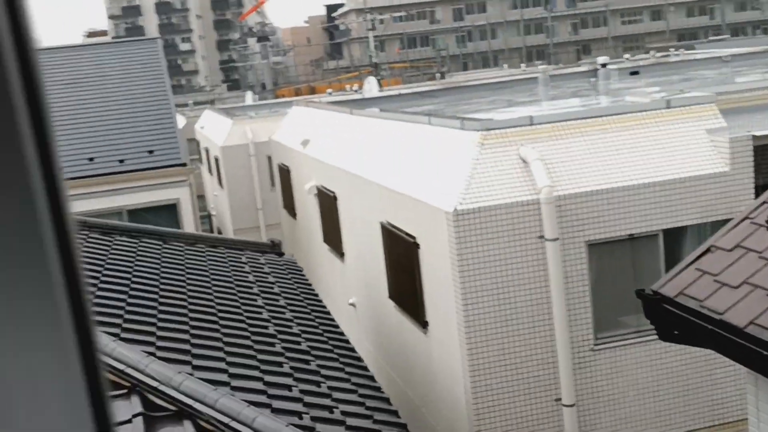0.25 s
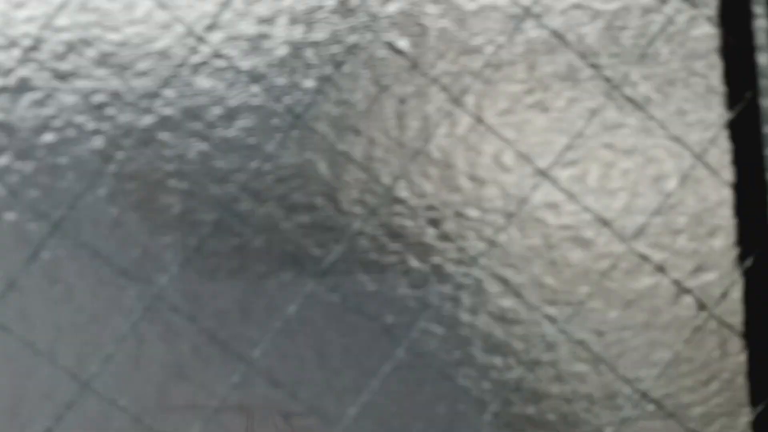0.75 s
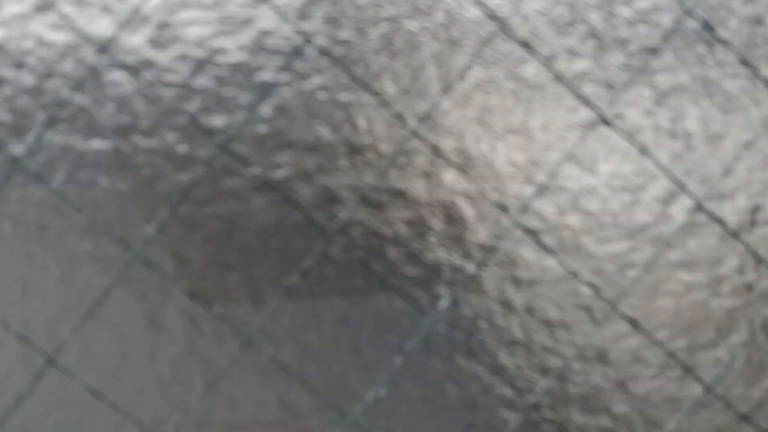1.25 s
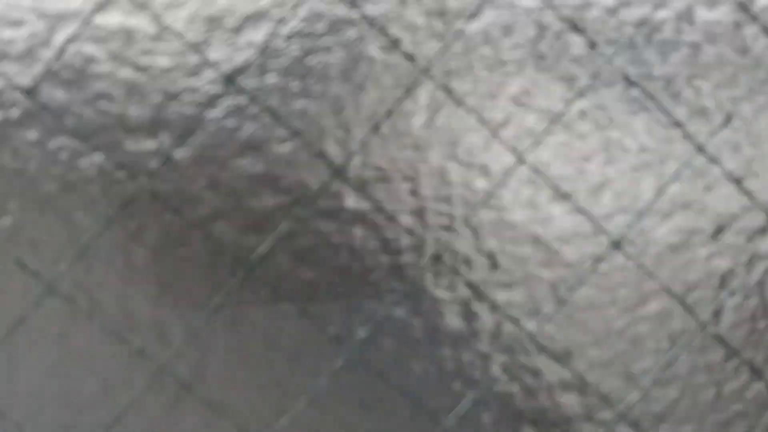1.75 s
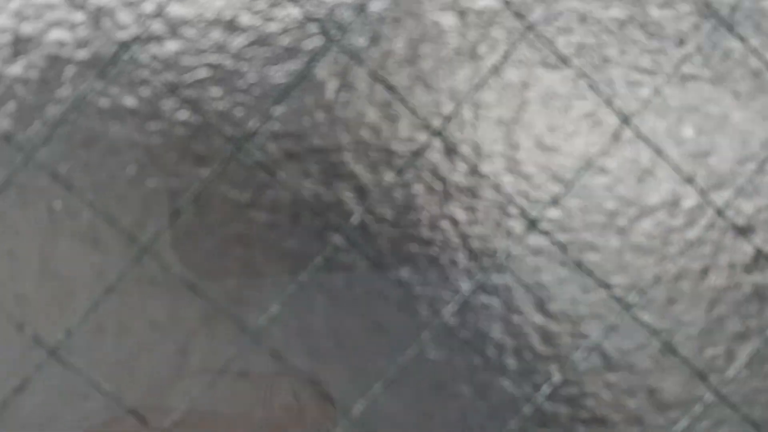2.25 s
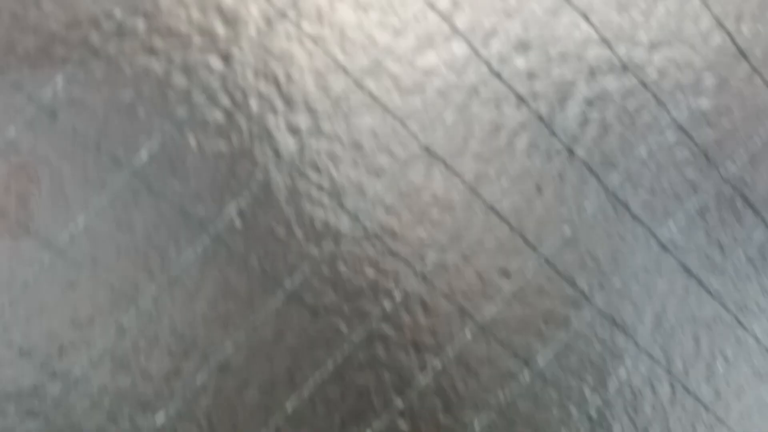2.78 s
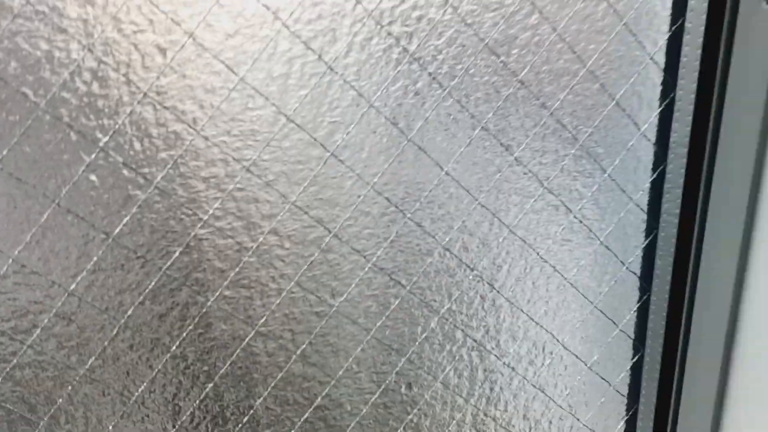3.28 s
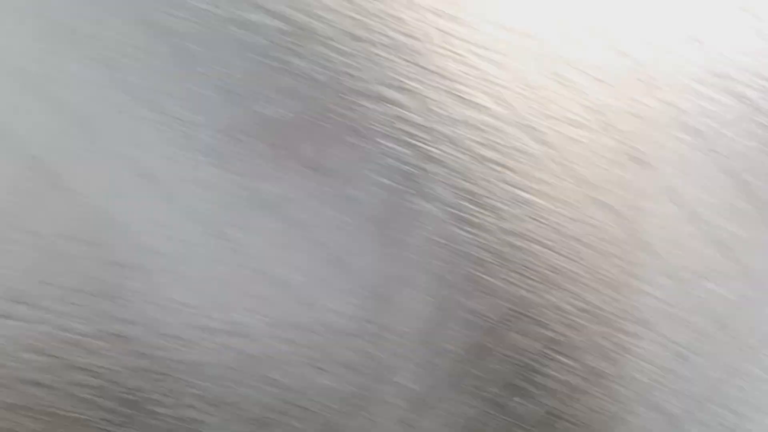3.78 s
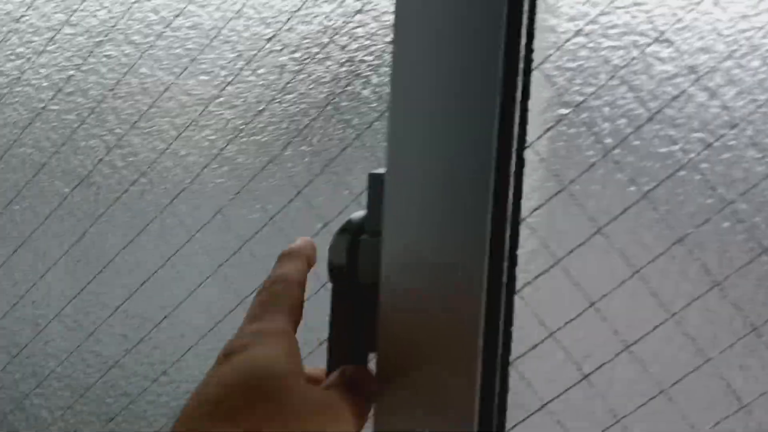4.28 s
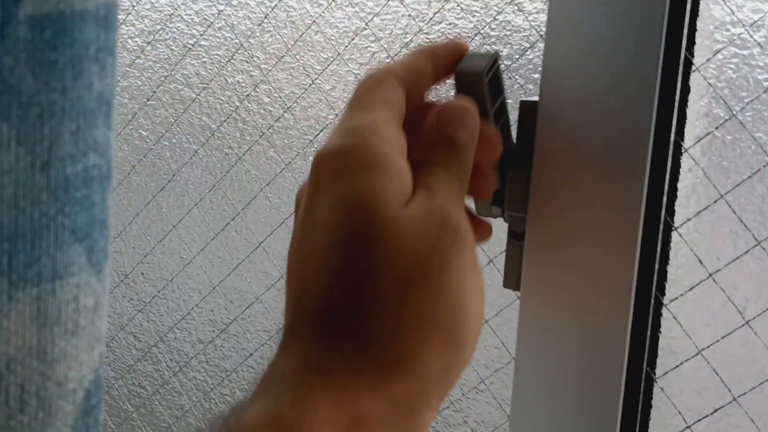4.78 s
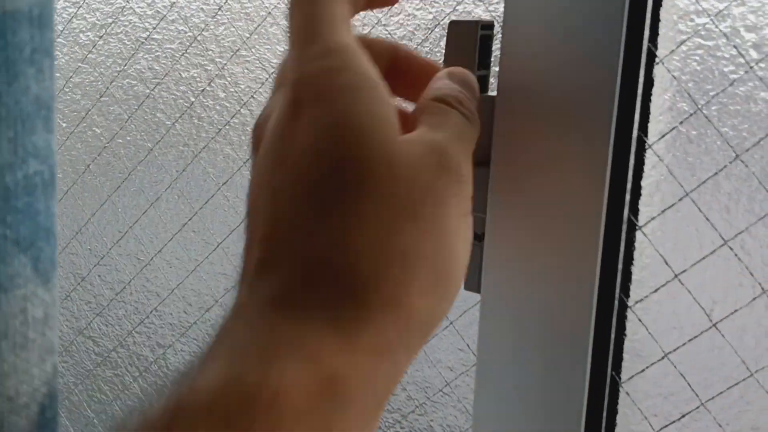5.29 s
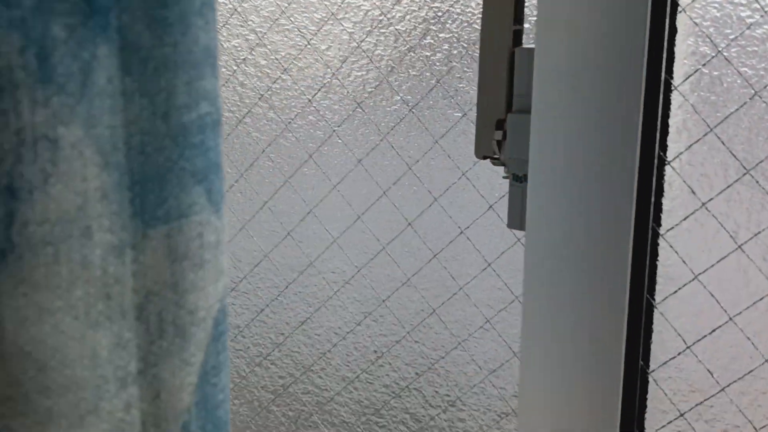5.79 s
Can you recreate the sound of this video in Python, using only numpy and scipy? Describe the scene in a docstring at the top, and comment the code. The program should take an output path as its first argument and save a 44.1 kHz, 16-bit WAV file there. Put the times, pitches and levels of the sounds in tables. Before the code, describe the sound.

A metal window scrapes along its track and slams, muffling the rain, followed by a sharp snap and the small clicks of a lock.

```python
"""A small room, a phone's microphones close to an open aluminium window, rain hissing on the roofs outside.
The sash rolls along its gritty track, scrapes as it binds, then slams into the frame at 2 s and rebounds.
The pane booms, and the rain is left faint and dull behind the glass. A sprung catch snaps on the left,
a sleeve swishes among a few light taps, and at 4.5 s a hand turns the crescent lock in short pushes:
its lever clicks and its cam judders into the keeper."""
import sys
import numpy as np
from scipy import signal
from scipy.fft import rfft, irfft
from scipy.io import wavfile
from scipy.ndimage import map_coordinates

SR = 44100
rng = np.random.default_rng(int(sys.argv[2]) if len(sys.argv) > 2 else 0)


def output_pcm(signal):
    """Save a mono or channel-first signal as 16-bit PCM at the path in sys.argv[1].

    Samples are clipped to [-1, 1] before scaling.
    """
    pcm = np.clip(np.atleast_2d(signal).T, -1, 1) * 32767
    wavfile.write(sys.argv[1], SR, np.round(pcm).astype(np.int16))


N = 266275
T = np.arange(N) / SR
FFT_SIZE = 5 * 2 ** 16
HZ = np.maximum(np.arange(FFT_SIZE // 2 + 1) * SR / FFT_SIZE, 1)

# The sash bumps along, slams home, rattles and rebounds; later the hand knocks it.
# Each row: start in seconds, then pane thump, frame clack and metal click in dB.
SASH_KNOCKS = [(1.225, -40, -60, -70), (1.334, -41, -38, -63), (1.708, -39, -31.5, -64),
               (1.9871, -28, -23.5, -50), (1.992, -28.5, -19.5, -32), (1.9952, -20.5, -10.5, -19),
               (2.0007, -16, -20, -16), (2.0194, -25.5, -36, -44), (2.031, -26, -26, -26),
               (2.056, -20, -47, -44), (2.198, -38, -44, -53), (2.209, -27, -30.5, -29.5),
               (2.226, -33.5, -37, -50), (2.239, -30.5, -41, -56), (2.268, -35, -36.5, -38.5),
               (2.629, -65, -44, -41), (4.004, -47, -51, -55), (4.829, -62, -31, -58)]
# Snaps of the catch. Each row: start in seconds, level in dB, crack's t60 in seconds, frame tick in dB.
CATCH_SNAPS = [(0.109, -43, 0.052, -65), (0.17, -33.5, 0.038, -35.5), (2.6494, -10, 0.023, -40),
               (2.651, -22.5, 0.11, -30.5), (3.249, -41, 0.095, -40)]
# Hiss of rubbing fibres, in brush seal and cloth alike. Each row: frequency in Hz, relative level in dB.
FIBRE_COLOUR = [(800, -21), (3000, -15), (5200, 2), (8000, -1), (11000, -1), (13000, -9), (16000, -24)]


def undb(db):
    """Decibels to gain."""
    return 10 ** (np.asarray(db) / 20)


def unit(x):
    """Scale to rms 1."""
    return x / np.sqrt(np.mean(x ** 2))


def pan(left_db):
    """Gains of the two channels: left minus right in dB, so a negative value sits to the right."""
    return undb(np.array([[1], [-1]]) * left_db / 2)


def response(points, grid=HZ):
    """Gain at each frequency of the grid from (Hz, dB) points."""
    hz, db = np.transpose(points)
    return undb(np.interp(np.log(grid), np.log(hz), db))


def resonance(hz, width_hz):
    """Band-pass response, gain 1 at the centre."""
    return 1 / (1 + 1j * (HZ ** 2 - hz ** 2) / (HZ * width_hz))


def body(resonances):
    """Response of several steep-sided (Hz, width in Hz, dB) resonances."""
    return sum(undb(db) * resonance(hz, width) ** 2 for hz, width, db in resonances)


def filtered(x, gain):
    """Pass a sound through a frequency response."""
    return irfft(rfft(x, FFT_SIZE) * gain)[..., :N]


def colour(x, points, size=4096):
    """Minimum-phase filter shaped by (Hz, dB) points; it keeps the power of white noise."""
    grid = np.maximum(np.arange(size // 2 + 1) * SR / size, 1)
    cepstrum = irfft(np.log(unit(response(points, grid))))
    impulse = irfft(np.exp(rfft(2 * cepstrum[:size // 2], size) - cepstrum[0]))
    return signal.oaconvolve(x, impulse[None], axes=1)[:, :N]


def soften(x, hz):
    """A yielding contact lengthens the push and takes off the treble."""
    return filtered(x, 1 / (1 + np.sqrt(2) * 1j * HZ / hz - (HZ / hz) ** 2))


def bend(pair, ratio):
    """Move every resonance of a sound by a changing pitch ratio."""
    return np.array([map_coordinates(x, [np.cumsum(ratio)], mode="mirror") for x in pair])


def diffuse(pair, shared_hz=230):
    """Long waves reach both microphones alike, short ones are unrelated."""
    mid = pair[0]
    side = signal.sosfilt(signal.butter(2, shared_hz, "high", fs=SR, output="sos"), pair[1])
    return np.array([mid + side, mid - side]) / np.sqrt(2)


def wander(rate):
    """Slow random drift of rms 1, through `rate` points a second."""
    return unit(np.interp(T * rate, np.arange(1000), rng.standard_normal(1000)))


def decay(s, t60):
    """Envelope that jumps to 1 at time s and dies away."""
    envelope, start = np.zeros(N), int(s * SR)
    t = T[:min(SR // 2, N - start)]
    envelope[start:start + len(t)] = np.exp(-np.log(1000) * t / t60)
    return envelope


def stroke(s, attack_s, hold_s, release_t60):
    """Envelope of a push that starts at time s: rise, hold, die away."""
    rise = np.clip((T - s) / attack_s, 0, 1)
    released_s = np.maximum(T - s - attack_s - hold_s, 0)
    return rise * np.exp(-np.log(1000) * released_s / release_t60)


def grains(rate, share, flutter_db=0.8):
    """Tiny impacts, `rate` a second, carry a share of the power over a wash of countless fainter ones."""
    impacts = (rng.random((2, N)) < rate / SR) * rng.standard_normal((2, N))
    texture = np.sqrt(share) * unit(impacts) + np.sqrt(1 - share) * rng.standard_normal((2, N))
    return diffuse(texture) * undb(flutter_db * wander(30))


def chatter(hits):
    """Dense metal modes ring as a short noise after each (s, dB, t60) hit."""
    envelope = sum(undb(db) * decay(s, t60) for s, db, t60 in hits)
    return envelope * diffuse(rng.standard_normal((2, N)), shared_hz=696)


def struck(hits, modes):
    """Ring (Hz, dB, t60) modes with a push at each (s, dB) hit."""
    pushes = np.zeros(N)
    for s, db in hits:
        pushes[int(s * SR)] += undb(db)
    t = T[:SR]
    ring = sum(undb(db) * np.exp(-np.log(1000) * t / t60) * np.cos(2 * np.pi * hz * t)
               for hz, db, t60 in modes)
    return filtered(pushes, rfft(ring, FFT_SIZE))


def room(x, wet_db, t60=0.29, treble_t60=0.18, split_hz=4000):
    """A small room: the near walls answer after a few ms and swallow the treble first."""
    noise = rng.standard_normal((2, N))
    low = filtered(noise, 1 / (1 + (HZ / split_hz) ** 2))
    tail = low * decay(0.0062, t60) + (noise - low) * decay(0.0055, treble_t60)
    return x + undb(wet_db) * filtered(x, rfft(unit(tail) / np.sqrt(N), FFT_SIZE))


def travel():
    """Speed of the sash, and the share of the opening that it has yet to cover."""
    # The push on the sash. Each row: time in seconds, share of top speed.
    push = [(0.19, 0.139), (0.33, 0.89), (.56, 0.7), (.93, 1), (1.33, 0.74), (1.5, 0.53), (1.84, 0.37),
            (1.97, 0.783), (1.99, 0.15)]
    speed = np.interp(T, *np.transpose(push), left=0, right=0)
    covered = np.cumsum(speed)
    return speed, 1 - covered / covered[-1]


def rain(outside_db=-48, indoors_db=-52):
    """Drops on the roofs outside reach the microphones through the gap; a dull wash passes the glass."""
    # Rain through the gap and through the glass. Each row: frequency in Hz, relative level in dB.
    gap_colour = [(30, -24), (100, 1), (250, 3.5), (600, -17), (1050, -1.5), (1500, -13), (2500, -16.5),
                  (4000, -19.5), (9000, -25), (16000, -34)]
    glass_colour = [(25, -20), (55, 3), (100, 10), (160, 5.5), (240, 1), (305, 5.5), (385, -4.5),
                    (700, -6.5), (1300, -5.5), (2000, -9), (3500, -18.5), (7000, -28.5), (16000, -32.5)]
    _, gap = travel()
    outside = colour(grains(rate=1700, share=0.57), gap_colour)
    inside = colour(grains(rate=760, share=0.22), glass_colour)
    return undb(outside_db) * np.sqrt(gap) * outside + undb(indoors_db) * inside


def arm(reach_s=3.675, rub_db=-44.5):
    """Sleeve fibres catch and slip close by: the rustle follows the arm's speed, the swish its square."""
    # Arm movements. Each row: fastest moment and swell time in seconds, rustle and swish in dB.
    moves = [(2.8, 0.33, -66.5, -58.5), (3.76, 0.38, -61, -46), (4.5, 0.2, -65, -53.5),
             (5.83, 0.15, -66.5, -66)]
    # The sleeve's swish. Each row: frequency in Hz, relative level in dB.
    swish_colour = [(200, -4.5), (700, -5), (1000, -9), (1600, -6.5), (2600, -4), (3300, -10),
                    (4500, -15.5), (8000, -23), (15000, -30)]
    # Resonances of the rubbing sleeve. Each row: centre and width in Hz, level in dB.
    rub_rings = [(2510, 210, -7), (2930, 480, -5), (3340, 300, 1), (3900, 680, -6.5)]
    rustle, swish = 0, 0
    for s, swell_s, rustle_db, swish_db in moves:
        speed = np.exp(-np.abs(T - s) / swell_s)
        rustle += undb(rustle_db) * speed
        swish += undb(swish_db) * speed ** 2
    cloth = rustle * colour(grains(rate=2100, share=0.53), FIBRE_COLOUR)
    weave = swish * colour(grains(rate=1700, share=0.11), swish_colour)
    # On the long reach for the lock the sleeve rubs with a thin, wavering ring.
    fibres = grains(rate=450, share=0.6, flutter_db=1.5)
    rub = unit(bend(filtered(fibres, body(rub_rings)), 1 + 0.03 * wander(14)))
    reach = stroke(reach_s, attack_s=0.033, hold_s=0.055, release_t60=0.83)
    return cloth + weave + undb(rub_db) * reach * rub


def upright_thuds():
    """The sash's upright answers soft pushes with a short, low knock."""
    # Pushes of the hand and the catch. Each row: start in seconds, level in dB.
    pushes = [(.094, -42), (.108, -48.5), (2.631, -39.5), (2.676, -35), (2.775, -44), (4.703, -51),
              (4.733, -55), (4.833, -38.5)]
    # Modes of the upright. Each row: frequency in Hz, level in dB, t60 in seconds.
    modes = [(94, -13, 0.17), (153, -7.5, 0.45), (200, -5, 0.16), (219, 2, 0.19), (235, -6, 0.093),
             (303, -6, 0.17), (318, -20, .12), (470, -11, .12), (520, -11, .12)]
    return soften(struck(pushes, modes), hz=330)


def metal_taps():
    """Light taps on thin metal: a bright tick and a short ring near 3 kHz, with plenty of room."""
    # The taps. Each row: start in seconds, tick in dB, tick's t60 in seconds, ring in dB.
    taps = [(3.51, -44, 0.025, -64), (3.593, -40, 0.012, -69), (3.756, -32.5, 0.045, -61),
            (4.005, -30.5, 0.035, -49)]
    # The tick. Each row: frequency in Hz, relative level in dB.
    tick_colour = [(200, -9), (450, 2.5), (900, -9), (2000, -5), (2600, 8), (3450, 8.5), (4000, -3.5),
                   (6000, -9), (12000, -27)]
    # Modes of the tapped metal. Each row: frequency in Hz, level in dB, t60 in seconds.
    modes = [(2400, -11, 0.091), (2970, -9, .14), (2972, -2, 0.28), (3400, -15, 0.058)]
    tick = colour(chatter([(s, db, t60) for s, db, t60, _ in taps]), tick_colour)
    ring = struck([(s, db) for s, _, _, db in taps], modes)
    return room(tick + ring, wet_db=-6)


def frame_ticks(q=1.28, jolt_hz=1640, jolt_t60=0.056, knock_offset_db=-11.5):
    """Each tick rings one broad resonance of the frame; every knock and snap also jolts one out of it."""
    # Ticks and creaks of the frame, some alone, some with a knock, snap or tap.
    # Each row: start in seconds, level in dB, centre in Hz, t60 in seconds.
    ticks_and_creaks = [(.109, -45.5, 3840, 0.066), (.171, -37.5, 3970, 0.027), (1.889, -34.5, 1270, 0.074),
                        (1.963, -33.5, 1300, 0.06), (2.21, -36.5, 1420, 0.1), (2.268, -38, 1760, 0.067),
                        (2.592, -43, 3180, 0.014), (2.858, -37, 1410, 0.049), (2.896, -37, 950, 0.03),
                        (3.142, -48.5, 2740, 0.035), (3.509, -42.5, 1700, 0.026),
                        (3.594, -41.5, 1900, 0.023), (4.748, -46, 1890, 0.087), (5.838, -44.5, 1840, 0.055),
                        (5.865, -43.5, 1270, 0.053)]
    jolts = [(s, db + knock_offset_db) for s, _, db, _ in SASH_KNOCKS]
    jolts += [(s, db) for s, _, _, db in CATCH_SNAPS]
    events = ticks_and_creaks + [(s, db, jolt_hz, jolt_t60) for s, db in jolts]
    ticks, length = np.zeros((2, N)), SR // 8
    for s, db, hz, t60 in events:
        b, a = signal.iirpeak(hz, q, fs=SR)
        noise = rng.standard_normal((2, length))
        band = unit(signal.lfilter(b, a, signal.lfilter(b, a, noise)))
        span = slice(int(s * SR), int(s * SR) + length)
        ticks[:, span] += undb(db) * decay(s, t60)[span] * band
    return room(ticks, wet_db=-7.5)


def crescent_lock():
    """Close to the microphones the lever clicks and rubs on its pivot, and the cam judders as it turns."""
    # Short pushes on the lever. Each row: start and hold in seconds, pivot rub and cam judder in dB.
    turns = [(4.496, 0.044, -45.5, -54), (4.594, 0.037, -45, -48), (4.688, 0.07, -52.5, -40),
             (4.825, 0.04, -47.5, -40)]
    # The lever's clicks. Each row: start in seconds, level in dB, t60 in seconds.
    lever_clicks = [(4.451, -39.5, 0.031), (4.4965, -34.5, 0.061), (4.505, -37, 0.028),
                    (4.647, -46.5, 0.033), (4.871, -48, 0.013), (4.929, -51, 0.013)]
    # Lever click and pivot rub. Each row: frequency in Hz, relative level in dB.
    click_colour = [(400, -1), (1800, 7), (3200, 0), (5600, 0), (8000, 0), (10000, -1.5), (11600, 0),
                    (13000, -12), (16000, -26)]
    rub_colour = [(300, -22), (500, 4), (620, 10), (780, -4), (1000, -15.5), (1900, -5), (3500, -24),
                  (5500, -20.5), (12000, -28.5)]
    # Resonances of the lock on the sash. Each row: centre and width in Hz, level in dB.
    judder_rings = [(120, 41, -11), (201, 27, -1), (311.4, 25, -3)]
    pivot, cam = 0, 0
    for s, hold_s, pivot_db, cam_db in turns:
        push = stroke(s, attack_s=0.0043, hold_s=hold_s, release_t60=0.24)
        pivot += undb(pivot_db) * push
        cam += undb(cam_db) * push
    slips = grains(rate=520, share=0.6, flutter_db=2)
    clicks = room(colour(chatter(lever_clicks), click_colour), wet_db=-17)
    return clicks + pivot * colour(slips, rub_colour) + cam * unit(filtered(slips, body(judder_rings)))


def keeper():
    """A little to the right, the cam knocks against its keeper, which rings briefly on the sash."""
    # The cam strikes and snaps home. Each row: start in seconds, level in dB.
    cam_hits = [(4.631, -56), (4.697, -46), (4.752, -48), (4.8295, -38.5), (4.8385, -48), (4.881, -59)]
    # Modes of the keeper. Each row: frequency in Hz, level in dB, t60 in seconds.
    modes = [(442, -5, 0.12), (493, -2, 0.13), (546, -10, 0.085), (595, 1.5, .1), (740, 4.5, 0.055),
             (900, -4, .07), (1115, -4, 0.056), (1215, 3, 0.05), (1436, -6, .07), (1707, -5, 0.081),
             (1850, -14, .07), (2230, -6, .07), (2800, -17, .08)]
    return room(pan(left_db=-2) * soften(struck(cam_hits, modes), hz=2550), wet_db=-13)


def catch(crack_db=-4, ring_db=-27, left_db_per_khz=0.5):
    """The sprung catch cracks and rings high; it sits left, so the phone shades its treble on the right."""
    # The crack. Each row: frequency in Hz, relative level in dB.
    crack_colour = [(300, -24.5), (1300, -4.5), (2450, -3), (3300, -9.5), (4800, -10), (5400, 3.5),
                    (6100, 7), (6600, -1), (7600, 8.5), (8500, -3.5), (9800, 1.5), (12500, -5.5),
                    (15000, -0.5)]
    # Modes of the steel catch. Each row: frequency in Hz, level in dB, t60 in seconds.
    modes = [(2440, -3, .08), (5650, -7, .1), (6090, -2, .1), (6500, -9, .07), (7520, -3, .09),
             (7680, -2, .11), (9515, -10, .1), (9860, -7, .11), (10130, -11, .09), (10400, -11, .1)]
    crack = undb(crack_db) * colour(chatter([(s, db, t60) for s, db, t60, _ in CATCH_SNAPS]), crack_colour)
    ring = undb(ring_db) * struck([(s, db) for s, db, _, _ in CATCH_SNAPS], modes)
    return filtered(room(crack + ring, wet_db=-14.5), pan(left_db_per_khz * HZ / 1000))


def sash_binding(start_s=1.628, scrape_db=-45, squeal_db=-54, pinch_db=-54.5):
    """Near the jamb the sash scrapes and sings thinly against the frame, and the pinched seal hisses."""
    # Scraping sash and pinched seal. Each row: frequency in Hz, relative level in dB.
    scrape_colour = [(300, -14), (900, 2.5), (1300, 7), (2000, -2.5), (3500, -3.5), (7000, -15),
                     (9300, -30), (12000, -45)]
    pinch_colour = [(1500, -11), (4000, 1), (7000, -1), (9200, 5), (10500, -5), (12500, -10), (16000, -34)]
    # Resonances of the squeal. Each row: centre and width in Hz, level in dB.
    squeal_rings = [(2680, 140, -11), (3120, 120, -13), (3570, 75, -4.5), (4340, 87, -14), (4970, 66, -6)]
    scrape = undb(scrape_db) * stroke(start_s, attack_s=0.076, hold_s=0.091, release_t60=0.25)
    squeal = undb(squeal_db) * stroke(start_s, attack_s=0.077, hold_s=0.12, release_t60=0.22)
    pinch = undb(pinch_db) * stroke(start_s, attack_s=0.12, hold_s=0.14, release_t60=0.29)
    slips = grains(rate=330, share=0.58)
    hiss = colour(grains(rate=6000, share=0.16), pinch_colour)
    singing = unit(filtered(slips, body(squeal_rings)))
    return squeal * singing + scrape * colour(slips, scrape_colour) + pinch * hiss


def sash_rolling(rumble_db=-38, open_db=-8, grind_db=-45, seal_db=-52, glide=0.12):
    """Rollers shake the pane and crunch over grit in the ringing track, while the brush seal hisses."""
    # Pane rumble, track crunch and dragged grit. Each row: frequency in Hz, relative level in dB.
    rumble_colour = [(25, -1), (60, -3.5), (110, 8), (150, -7.5), (205, 7), (300, -15), (480, -18),
                     (700, -13.5), (2000, -52)]
    crunch_colour = [(200, -14), (450, -11), (650, -5.5), (1100, -6.5), (1300, 2), (1900, -1.5),
                     (2700, -4.5), (3800, -12), (8000, -27)]
    drag_colour = [(500, -13), (1200, 1), (2000, -2), (2800, 0), (3800, -16), (8000, -19), (16000, -25)]
    # Resonances of the hollow track, and of the rollers at half travel.
    # Each row: centre and width in Hz, level in dB.
    track_rings = [(455, 96, 10), (1049, 40, 12.5)]
    roller_rings = [(1506, 83, 7), (2005, 140, -4), (2640, 200, 0)]
    # Gritty patches where the rollers drag. Each row: start and hold in seconds, level in dB.
    grit_patches = [(0.27, 0.023, -50), (0.38, 0.028, -46.5), (1.1, 0.033, -46.5), (1.216, 0.019, -54)]
    speed, gap = travel()
    # As the gap closes the rumble swells and the rollers' rings waver and sink.
    shaking = colour(grains(rate=110, share=0.037, flutter_db=3), rumble_colour)
    rumble = undb(rumble_db + open_db * gap) * speed * shaking
    crunch = colour(grains(rate=420, share=0.45, flutter_db=1.4), crunch_colour)
    pitch = 1 + glide * (gap - 0.5)
    rollers = sum(bend(filtered(crunch, body([ring])), pitch + 0.016 * wander(9)) for ring in roller_rings)
    track = filtered(crunch, 1 + body(track_rings))
    grind = undb(grind_db) * speed ** 0.93 * unit(track + rollers)
    drag = sum(undb(db) * stroke(s, attack_s=0.011, hold_s=hold_s, release_t60=0.11)
               for s, hold_s, db in grit_patches)
    patches = drag * colour(grains(rate=500, share=0.52), drag_colour)
    seal = undb(seal_db) * speed ** 1.64 * colour(grains(rate=5900, share=0.67), FIBRE_COLOUR)
    return rumble + grind + patches + seal


def jamb_slam():
    """The sash slams home and the hollow jamb gives one short, hard bark."""
    # The one row: start in seconds, level in dB.
    hit = [(1.9972, -18.5)]
    # Modes of the jamb. Each row: frequency in Hz, level in dB, t60 in seconds.
    modes = [(780, -1, 0.069), (859, 0.5, 0.053), (950, -5, .03), (1334, -17, .045)]
    return room(soften(struck(hit, modes), hz=1500), wet_db=-16)


def sash_blows(boom_db=-2, clack_db=-0.5, ring_db=-12, click_db=-3.5, clack_t60=0.032, click_t60=0.022):
    """Each blow booms in the pane, clacks and rings in the hollow frame and clicks metal on metal."""
    # Modes of glass pane and aluminium frame. Each row: frequency in Hz, level in dB, t60 in seconds.
    pane_modes = [(49, -18, 0.253), (62.4, -13.5, 0.56), (75.8, -7, 0.44), (105.9, -6.5, 0.63),
                  (130.7, -0.5, 0.11), (161, -20, 0.084), (166, -5.5, 0.26), (190.7, 0, 0.47),
                  (211.9, 2.5, 0.28), (303.5, -15, 0.25), (383.6, -8.5, 0.26), (457, -8, 0.14),
                  (531, -10.5, 0.34)]
    frame_modes = [(657, -14, 0.1), (1334, -10, 0.089), (1470, -5.5, .13), (1720, -11.5, 0.079),
                   (1780, -16, 0.099), (2375, -12, .15)]
    # Frame clack and metal click. Each row: frequency in Hz, relative level in dB.
    clack_colour = [(100, -25), (380, -4), (470, -6), (540, -1), (600, -18.5), (660, -4), (720, -4),
                    (790, 0), (880, 3), (1010, -1), (1130, -14), (1320, 2.5), (1600, -21), (2300, -16.5),
                    (3500, -35.5), (8000, -35), (16000, -55)]
    click_colour = [(400, 1), (1800, 3), (3700, 3), (5500, 8), (7800, 2), (10000, 1.5), (12800, -3.5),
                    (14800, -6), (16000, -8)]
    pane_hits = [(s, db) for s, db, _, _ in SASH_KNOCKS]
    frame_hits = [(s, db) for s, _, db, _ in SASH_KNOCKS]
    metal_hits = [(s, db, click_t60) for s, _, _, db in SASH_KNOCKS]
    # The rubber glazing bead softens the push on the glass.
    boom = undb(boom_db) * soften(struck(pane_hits, pane_modes), hz=320)
    clack = undb(clack_db) * colour(chatter([(s, db, clack_t60) for s, db in frame_hits]), clack_colour)
    ring = undb(ring_db) * soften(struck(frame_hits, frame_modes), hz=2800)
    click = undb(click_db) * pan(left_db=-2) * colour(chatter(metal_hits), click_colour)
    return boom + room(clack + ring + click, wet_db=-12)


def scene():
    """Rain outside; close by, the window and the hand that shuts and locks it."""
    window = sash_rolling() + sash_binding() + jamb_slam() + sash_blows() + frame_ticks()
    hand = upright_thuds() + catch() + metal_taps() + arm() + crescent_lock() + keeper()
    return rain() + window + hand


def record(dry, port_hz=9900, port_width_hz=1300, port_db=7, left_lag_s=0.001107, band_hz=(38, 16000)):
    """The phone's microphone ports ring near 10 kHz; the left is fuller and late, the right brighter."""
    # Balance of the two ports. Each row: frequency in Hz, left minus right in dB.
    balance = [(60, 15), (200, 11), (600, 11.5), (1300, 11), (2400, 10), (4400, 5.5), (8100, -0.5),
               (15000, -13.5)]
    ratio = response(balance)
    left = ratio * np.exp(-2j * np.pi * HZ * left_lag_s)
    sides = np.array([left, np.ones_like(HZ)]) * np.sqrt(2 / (1 + ratio ** 2))  # keeps the total power
    port_ring = 1 + undb(port_db) * resonance(port_hz, port_width_hz)
    heard = filtered(dry, sides * port_ring)
    low_cut = signal.butter(4, band_hz[0], "high", fs=SR, output="sos")
    high_cut = signal.ellip(8, 0.2, 70, band_hz[1], fs=SR, output="sos")
    return signal.sosfilt(high_cut, signal.sosfilt(low_cut, heard))


dry = scene()
out = record(dry)
output_pcm(out)
```